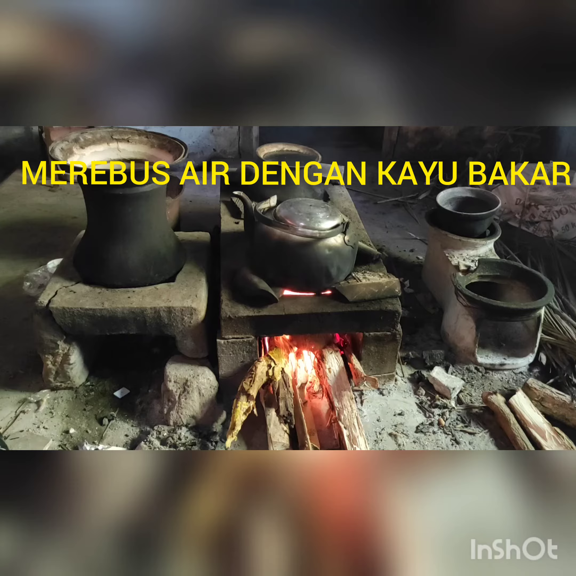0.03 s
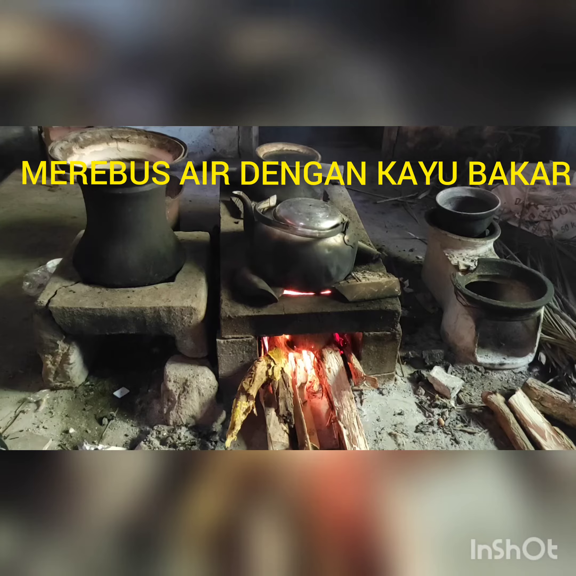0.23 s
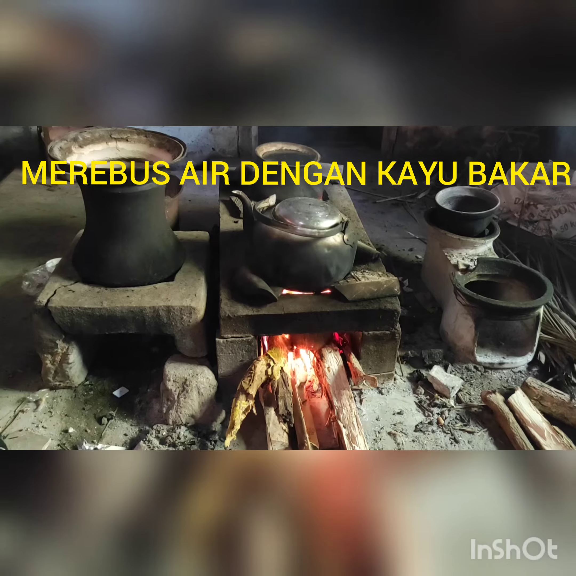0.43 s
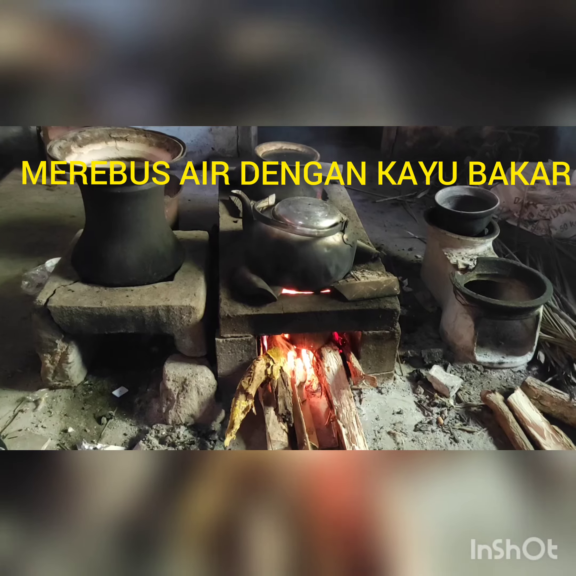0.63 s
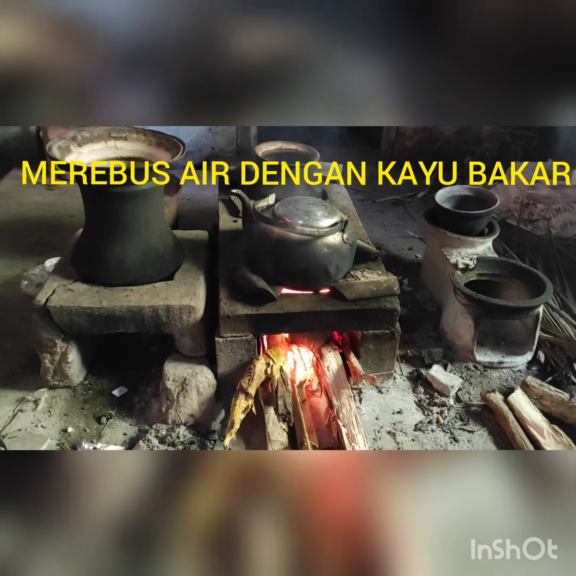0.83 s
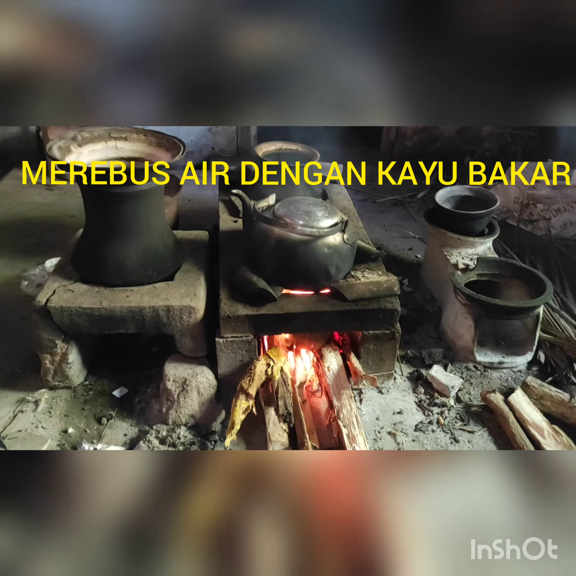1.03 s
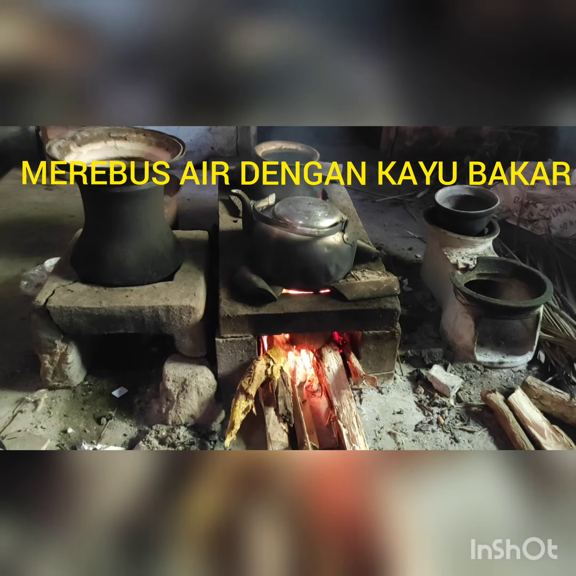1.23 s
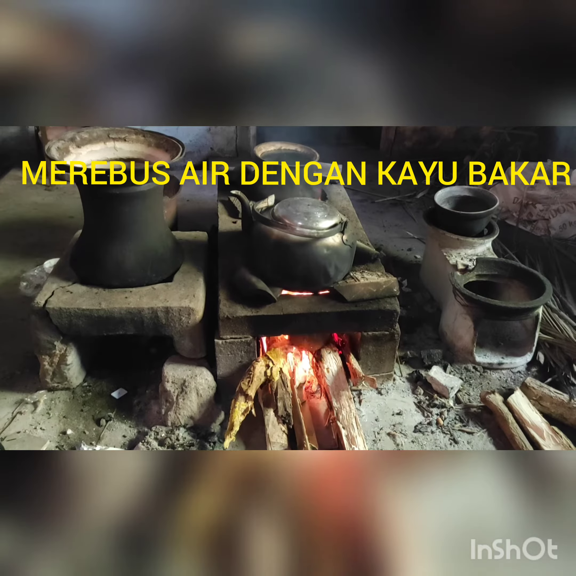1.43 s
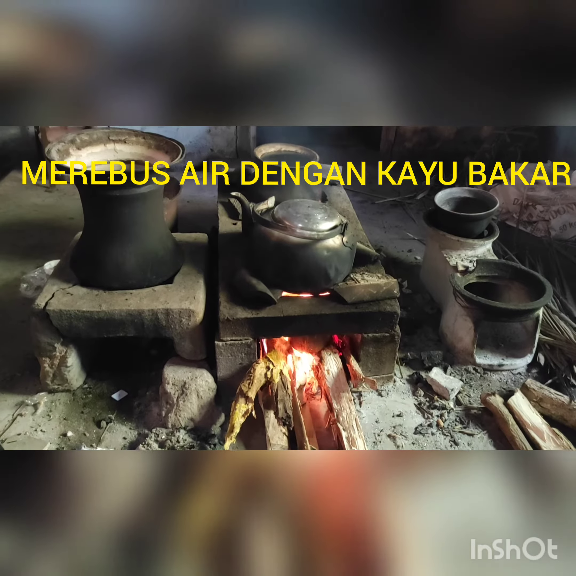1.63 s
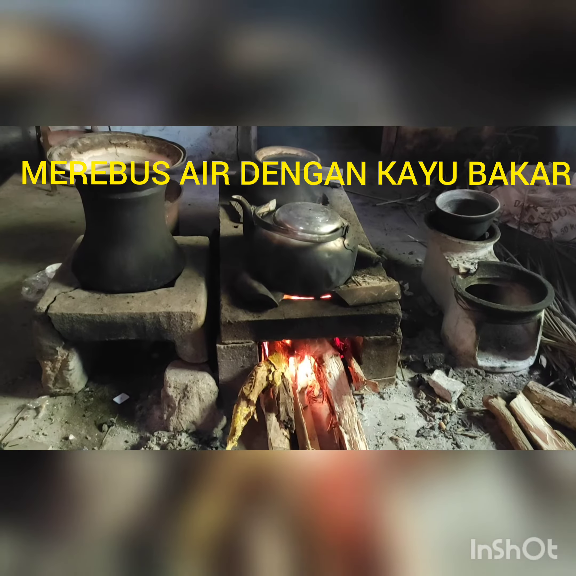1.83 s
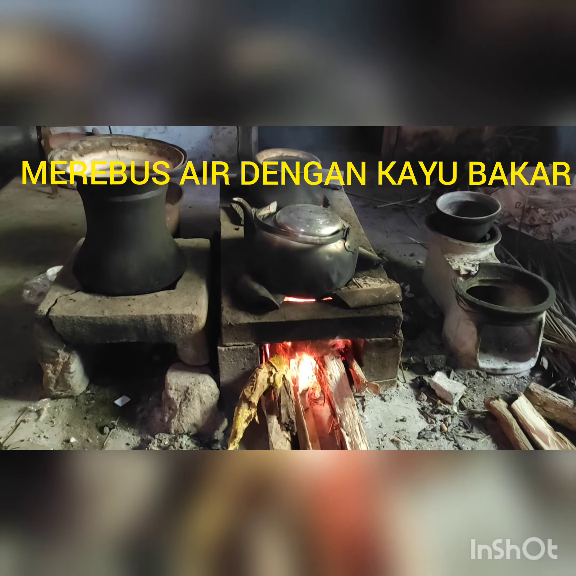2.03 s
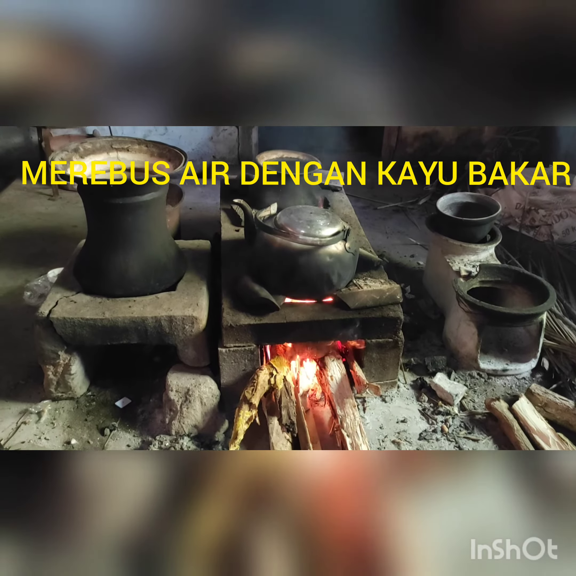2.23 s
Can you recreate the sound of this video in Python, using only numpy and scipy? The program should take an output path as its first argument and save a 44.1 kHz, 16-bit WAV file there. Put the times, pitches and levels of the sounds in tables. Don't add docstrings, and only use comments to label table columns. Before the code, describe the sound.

A wood fire crackles and snaps close by, over soft fluttering flames and fine ember hiss

```python
import sys
import numpy as np
from scipy import signal
from scipy.io import wavfile
from scipy.ndimage import uniform_filter1d

SR = 44100
rng = np.random.default_rng(int(sys.argv[2]) if len(sys.argv) > 2 else 0)


def convert_level_to_amplitude(level_db):
    exponent = np.asarray(level_db, float) / 20
    return 10 ** exponent


def materialize(psi):
    bounded = np.clip(np.atleast_2d(psi).T, -1, 1)
    quanta = np.round(bounded * 32767).astype(np.int16)
    wavfile.write(sys.argv[1], SR, quanta)


N = 101429

# time in seconds, gain in dB.
WAKE_FADE = [(0, -70), (.062, -39), (.07, -17), (.105, -4), (.17, -2), (.25, 0.4)]
# time in seconds, gain in dB.
RUMBLE_WAKE = [(0, -12), (.11, -26), (.17, 6.5), (.25, 1), (1.2, 0), (1.35, -4), (2.3, -3.5)]
# frequency in Hz, correlation (0 to 1).
LIKENESS = [(30, 0.9), (200, 0.89), (450, 0.51), (740, 0.4), (1220, 0.012), (15000, 0.009)]
# frequency in Hz, left over right in dB.
NOISE_LEAN = [(30, 6), (250, 6), (700, 2.5), (1500, 4.5), (3500, 5), (15000, 2)]
# time in seconds, level in dB.
DRAUGHT_LEVEL = [(0.07, -75), (0.09, -62.5), (0.19, -72.5), (0.21, -85.5), (0.29, -69), (0.32, -68),
                 (0.54, -63.5), (0.7, -67.5), (0.71, -55.5), (0.9, -62.5), (1.17, -73.5), (1.22, -56),
                 (1.53, -67), (1.85, -62.5), (1.89, -55.5), (2.07, -64), (2.1, -69), (2.3, -57.5)]
# frequency in Hz, density in dB per Hz.
AIR_SPECTRUM = [(12, -34), (20, 2), (91, -1.5), (135, 0.5), (238, -0.5), (263, -6.5), (474, -7.5),
                (589, -10.5), (2200, -26), (2860, -39), (4840, -120)]
# centre in Hz, width in Hz, level in dB.
BOX_TONES = [
    (48.3, 7, -65),
    (211.7, 42, -68.5),
    (474.5, 21, -76.5),
]
# time in seconds, level in dB.
POT_LEVEL = [(0, -64.5), (.19, -66), (.26, -79), (.7, -76.5), (.78, -59.5), (.86, -76.5), (2.3, -75.5)]
# frequency in Hz, density in dB per Hz.
HISS_SPECTRUM = [(1500, -6), (3200, -2), (4600, 4), (9000, 1.5), (15700, -11.5)]
# frequency in Hz, gain in dB.
LEFT_PORT = [(3500, -9.5), (5100, -16.5), (6200, -14), (7000, -12.5), (8400, -2.5), (9400, -9),
             (10100, -21.5), (15700, -19)]
# frequency in Hz, gain in dB.
RIGHT_PORT = [(3500, -6.5), (5100, -16), (6200, -0.5), (6800, -5), (7600, 0.5), (8900, -20), (10100, -21.5),
              (15700, -36.5)]
# start in seconds, peak in dB, ring in Hz, left over right in dB,
# broad crack against ring in dB.
WOOD_SNAPS = [(0.1048, -48.5, 8500, -1.0, -11), (0.2554, -53, 8700, 11, -9), (0.3612, -54.5, 8400, 14, -4),
              (0.6006, -33.5, 7830, 3, -8.5), (0.7084, -37.5, 8730, 1, -11), (0.8072, -47, 8900, -2, -12),
              (0.8915, -54.5, 7500, -5, -6), (0.9304, -44.5, 7540, 3, 5), (0.9738, -50, 7800, 5, 5),
              (1.0352, -50.5, 7750, -1, -17), (1.1215, -37, 7760, 4.5, -22), (1.1714, -47, 8100, 3, -10),
              (1.2133, -53.5, 8550, 6, -14), (1.3345, -42, 8700, 1, -20), (1.4028, -44, 7640, -3.5, -15),
              (1.418, -50.5, 7500, -3.5, -7), (1.4255, -58, 7400, -5, -8), (1.4512, -51, 7500, -1, 4),
              (1.462, -52, 7600, -4, 5), (1.474, -54, 7400, 1, -1), (1.48, -57, 7340, -4, -10),
              (1.5749, -36.5, 8540, 4.5, -17), (1.6353, -48.5, 8600, 7, -13), (1.7455, -52, 7500, 11, -3),
              (1.8299, -39.5, 7400, -4, -18), (1.8348, -25.5, 7200, -3.5, -11),
              (2.0414, -52.5, 7690, -5, -6)]
# frequency in Hz, gain in dB.
CRACKLE_TOP = [(9500, 2.5), (11000, 6), (15700, -11)]
# time in seconds, left and right in full-scale units.
MIC_OFFSET = [(.125, 0, 0), (.19, .028, .014), (.26, .039, .017), (.35, .029, .008), (.45, .015, .0015),
              (.55, .0055, -.0035), (.75, -.002, -.004), (1.1, -.004, -.0025), (2.3, -.001, 0)]
# time in seconds, share of gain lost.
GAIN_STEPS = [
    (0.127, 0.54),
    (0.189, 0.32),
    (0.25, 0.11),
    (0.289, 0.26),
]
# start in seconds, length in seconds, level in dB, first and last pitch in Hz.
CHICK_PEEPS = [(0.13, 0.17, -74.5, 4865, 4165), (0.26, 0.07, -67.5, 3730, 3100),
               (0.312, 0.05, -66.5, 2900, 2393), (0.389, 0.065, -91, 2650, 2600),
               (0.447, 0.2, -75, 4420, 4195), (0.566, 0.23, -68.5, 4333, 4370),
               (0.716, 0.19, -68, 4494, 4220), (0.796, 0.054, -66, 3600, 3340),
               (0.85, 0.064, -64.5, 3720, 2364), (0.916, 0.027, -64.5, 3090, 3010),
               (1.174, 0.1, -71, 4580, 3950), (1.274, 0.045, -68, 3720, 3460),
               (1.31, 0.047, -66.5, 3050, 2340), (1.621, 0.16, -71, 4765, 3890),
               (1.743, 0.035, -67, 3780, 3410), (1.761, 0.094, -68, 3265, 2334),
               (1.951, 0.065, -73, 3070, 2826), (1.879, 0.26, -76.5, 4414, 4344),
               (2.057, 0.18, -68.5, 4457, 3980), (2.167, 0.12, -67, 3560, 2573)]
# start in seconds, peak in dB, pitch in Hz.
FLAME_FLAPS = [(0.242, -47, 168), (0.397, -48.5, 202), (0.474, -53, 212), (0.525, -42.5, 176.5),
               (0.572, -42, 199), (0.605, -45.5, 237), (0.701, -41, 187), (0.715, -42.5, 213),
               (0.735, -38, 178.5), (0.772, -37.5, 218), (0.805, -40, 223), (0.826, -40, 196),
               (0.871, -39, 205), (0.92, -54, 218), (0.946, -42.5, 152.3), (0.984, -57, 145),
               (1.069, -46, 198), (1.219, -43, 205), (1.241, -43, 172), (1.288, -40, 203),
               (1.424, -49.5, 159), (1.483, -62, 193), (1.67, -47, 184), (1.748, -52, 198),
               (1.835, -46.5, 173), (1.868, -39.5, 194), (1.907, -39, 200), (1.962, -46, 202),
               (2.041, -54, 182), (2.12, -59, 237), (2.169, -52, 228), (2.236, -48, 143)]
# start in seconds, level in dB, centre in Hz.
STEAM_PUFFS = [
    (.27, -79, 12300),
    (.79, -80, 11400),
    (.965, -70.5, 12900),
    (1.21, -80, 12400),
    (1.33, -84, 14400),
    (1.631, -76, 13300),
    (1.74, -89, 13100),
    (1.85, -74.5, 13700),
]


def evened(x):
    return x / np.sqrt(np.mean(x ** 2) + 1e-20)


def read(points, hz):
    f, value = np.transpose(points)
    return np.interp(np.log(hz + 1), np.log(f + 1), value)


def curve(points, t):
    return np.interp(t, *np.transpose(points))


def add(mix, start_s, sound):
    part = mix[..., round(start_s * SR):][..., :sound.shape[-1]]
    part += sound[..., :part.shape[-1]]


def sides(lean_db):
    return convert_level_to_amplitude(np.array([[lean_db / 2], [-lean_db / 2]]))


def resonate(x, hz, width_hz):
    turn = np.exp(2j * np.pi * hz * np.arange(x.shape[-1]) / SR)
    r = np.exp(-np.pi * width_hz / SR)
    return 2 * (turn * signal.lfilter([1 - r], [1, -r], x / turn + 1e-18)).real


def resonate_twice(x, hz, width_hz):
    return resonate(resonate(x, hz, width_hz), hz, width_hz)


def noise(shape, size, patchy_db, flicker_db, follow):
    hop = size // 4
    frames, hz = N // hop + 5, np.fft.rfftfreq(size, 1 / SR)
    a, b, c, d, patches = rng.standard_normal((frames, len(hz), 5)).T
    patches = uniform_filter1d(patches, size=8, axis=0)
    patches = evened(uniform_filter1d(patches, size=12, axis=1))
    flicker = evened(uniform_filter1d(rng.standard_normal(frames), size=6))
    draught = curve(DRAUGHT_LEVEL, np.arange(frames) * hop / SR)
    draught -= draught.mean()

    same = np.clip(read(LIKENESS, hz), -1, 1)[:, None]
    lean = convert_level_to_amplitude(read(NOISE_LEAN, hz) / 2)[:, None]
    left = a + 1j * b
    right = same * left + np.sqrt(1 - same ** 2) * (c + 1j * d)
    z = np.array([left * lean, right / lean])

    inside = (hz >= shape[0][0]) & (hz <= shape[-1][0])
    level_db = read(shape, hz)[:, None] + patchy_db * patches + flicker_db * flicker + follow * draught
    z *= inside[:, None] * convert_level_to_amplitude(level_db)
    out = signal.istft(z, nperseg=size, noverlap=size - hop)[1][:, :N]
    return out / np.sqrt(np.mean(out.mean(0) ** 2))


def room(x, t60_s, delay_s):
    t = np.arange(SR // 2) / SR
    taps = rng.choice([-1., 1.], (2, len(t))) * (rng.random((2, len(t))) < .06)
    taps *= convert_level_to_amplitude(-60 * t / t60_s) * (t > delay_s)
    return signal.fftconvolve(x, taps / np.linalg.norm(taps[0]), axes=1)[:, :N]


def ports(x):
    hz = abs(np.fft.fftfreq(2048, 1 / SR))
    log_gain = np.log(convert_level_to_amplitude(np.array([read(LEFT_PORT, hz), read(RIGHT_PORT, hz)])))
    taps = np.fft.ifft(np.exp(np.conj(signal.hilbert(log_gain)))).real
    return signal.oaconvolve(x, taps[:, :1024], axes=1)[:, :N]


def draught_air():
    return convert_level_to_amplitude(-56) * noise(AIR_SPECTRUM, size=2048, patchy_db=2.5, flicker_db=1.5, follow=0.42)


def box_tones():
    out = np.zeros(N)
    for hz, width_hz, db in BOX_TONES:
        out += convert_level_to_amplitude(db) * evened(resonate_twice(rng.standard_normal(N), hz, width_hz))
    return out


def pot_hum():
    hum = evened(resonate_twice(rng.standard_normal(N), hz=476.4, width_hz=28))
    return convert_level_to_amplitude(curve(POT_LEVEL, np.arange(N) / SR)) * hum


def ember_hiss():
    hiss = noise(HISS_SPECTRUM, size=512, patchy_db=.7, flicker_db=.9, follow=.15)
    return convert_level_to_amplitude(-64) * evened(ports(hiss))


def whine():
    whine_hz, level_db, lean_db = 15625, -91, 6.7
    return convert_level_to_amplitude(level_db) * np.sin(2 * np.pi * whine_hz * np.arange(N) / SR) * sides(lean_db)


def ticks():
    rate_per_s, spread_db, level_db = 360, 9, -65
    size = convert_level_to_amplitude(spread_db * np.minimum(rng.exponential(1, N), 4)) * (rng.random(N) < rate_per_s / SR)
    return convert_level_to_amplitude(level_db) * evened(size * rng.uniform(-0.82, 1, (2, N)))


def snap(peak_db, ring_hz, lean_db, crack_db):
    rise_s, decay_s, width_hz, trim_db = .0008, .0024, 1800, 4.5
    t = np.arange(600) / SR
    envelope = np.minimum(t / rise_s, 1) * np.exp(-(t / decay_s) ** 1.3)
    split = rng.standard_normal((3, 600)) * envelope
    split = 0.6 * split[2] + split[:2]
    ring = resonate(resonate(split, ring_hz, width_hz), ring_hz, 2 * width_hz)
    ring = ring / abs(ring).max(axis=1, keepdims=True)
    crack = convert_level_to_amplitude(crack_db) * split / abs(split).max()
    return convert_level_to_amplitude(peak_db + trim_db) * (ring + crack) * sides(lean_db)


def crackle():
    out = ticks()
    for start_s, *settings in WOOD_SNAPS:
        add(out, start_s, snap(*settings))
    hz = np.linspace(0, SR / 2, 65)
    top = signal.firwin2(129, hz, convert_level_to_amplitude(read(CRACKLE_TOP, hz)), fs=SR)
    out = signal.oaconvolve(out, top[None], "same", axes=1)
    echo_db = -9
    return ports(out + convert_level_to_amplitude(echo_db) * room(out, t60_s=0.22, delay_s=.011))


def mic_offset(t):
    s, left, right = np.transpose(MIC_OFFSET)
    return uniform_filter1d(np.array([np.interp(t, s, left), np.interp(t, s, right)]), size=900, axis=1)


def step_gain(t):
    recover_s = 0.015
    gain = np.ones(N)
    for s, lost in GAIN_STEPS:
        gain *= 1 - lost * (t > s) * np.exp(-abs(t - s) / recover_s)
    return uniform_filter1d(gain, size=5)


def chicks():
    wobble_hz, rasp_hz, lean_db, wet_db = 25, 110, 2.1, 7
    out = np.zeros(N)
    for start_s, length_s, db, first_hz, last_hz in CHICK_PEEPS:
        u = np.arange(0, length_s, 1 / SR) / length_s
        wobble = evened(uniform_filter1d(rng.standard_normal(len(u)), size=500))
        rasp = evened(uniform_filter1d(rng.standard_normal(len(u)), size=120))
        hz = first_hz + (last_hz - first_hz) * u ** 1.2 + wobble_hz * wobble
        hz += rasp_hz * rasp * (last_hz < 3500)
        whistle = np.sin(2 * np.pi * np.cumsum(hz) / SR)
        add(out, start_s, convert_level_to_amplitude(db) * np.sin(np.pi * u) ** .5 * whistle)
    return out * sides(lean_db) + convert_level_to_amplitude(wet_db) * room(out[None], t60_s=.36, delay_s=0.0044)


def flaps():
    cycles, trim_db, upper_ratio, upper_db = 7.45, -4, 2.267, -13
    out = np.zeros(N)
    for start_s, db, hz in FLAME_FLAPS:
        u = np.arange(0, cycles, hz / SR) / cycles
        envelope = np.sin(np.pi * u ** 0.28) ** 2
        low = np.sin(2 * np.pi * (cycles * u + rng.random()))
        upper = np.sin(2 * np.pi * (upper_ratio * cycles * u + rng.random()))
        add(out, start_s, convert_level_to_amplitude(db + trim_db) * envelope * (low + convert_level_to_amplitude(upper_db) * upper))
    return out


def steam_puffs():
    length_s, width_hz, lean_db = .04, 3000, 7.9
    out = np.zeros((2, N))
    u = np.arange(0, length_s, 1 / SR) / length_s
    for start_s, db, hz in STEAM_PUFFS:
        breath = evened(resonate_twice(rng.standard_normal((2, len(u))), hz, width_hz))
        add(out, start_s, convert_level_to_amplitude(db) * np.sin(np.pi * u ** 0.5) * breath * sides(lean_db))
    return out


def scene():
    flame_lean_db = 6
    flames = draught_air() + (box_tones() + pot_hum() + flaps()) * sides(flame_lean_db)
    rumble = signal.sosfiltfilt(signal.butter(2, 150, fs=SR, output="sos"), flames)
    flames -= rumble * (1 - convert_level_to_amplitude(curve(RUMBLE_WAKE, np.arange(N) / SR)))
    return flames + ember_hiss() + whine() + crackle() + chicks() + steam_puffs()


def top_cut(x):
    return signal.sosfilt(signal.butter(12, 15930, fs=SR, output="sos"), x)


def record(dry):
    t = np.arange(N) / SR
    x = (dry * convert_level_to_amplitude(curve(WAKE_FADE, t)) + mic_offset(t)) * step_gain(t)
    edge_hz = 15700
    low_pass = signal.firwin(511, edge_hz, window=("kaiser", 9), fs=SR)
    mix = signal.oaconvolve(x, low_pass[None], "same")
    return top_cut(mix)


dry = scene()
out = record(dry)
materialize(out)
```